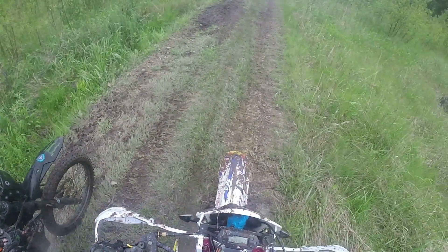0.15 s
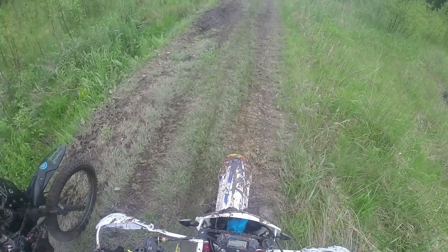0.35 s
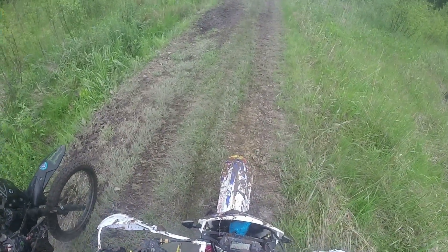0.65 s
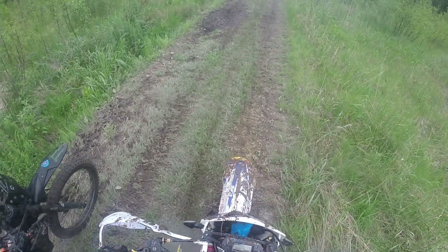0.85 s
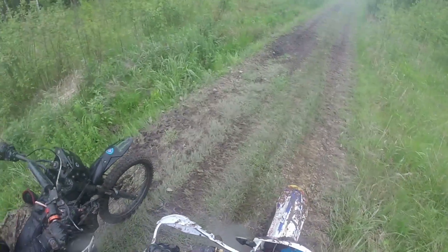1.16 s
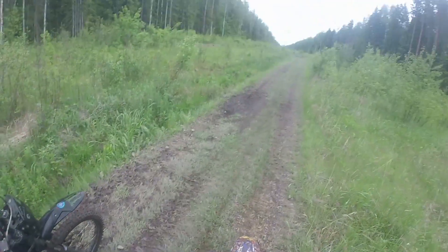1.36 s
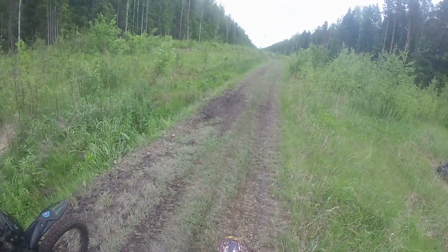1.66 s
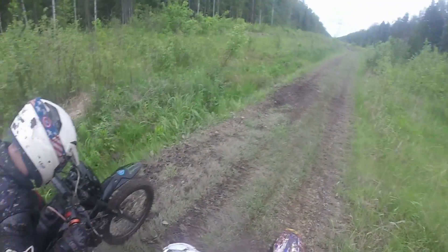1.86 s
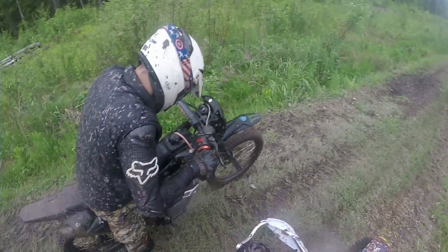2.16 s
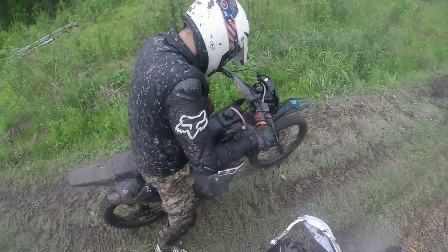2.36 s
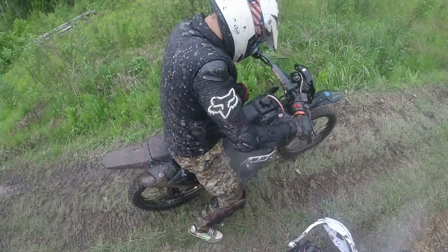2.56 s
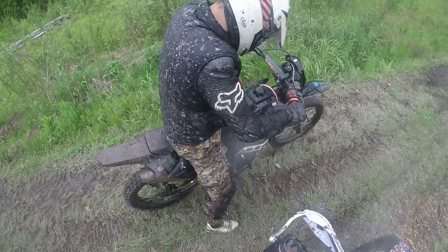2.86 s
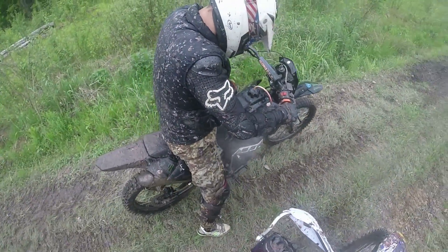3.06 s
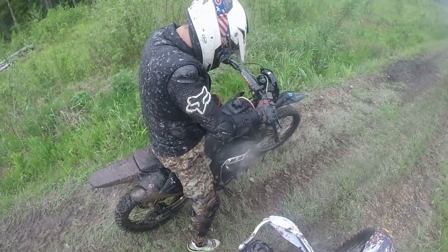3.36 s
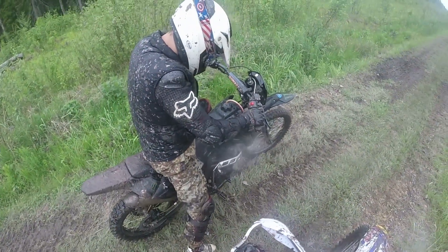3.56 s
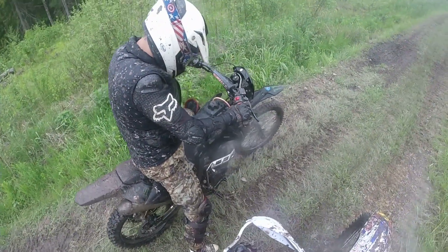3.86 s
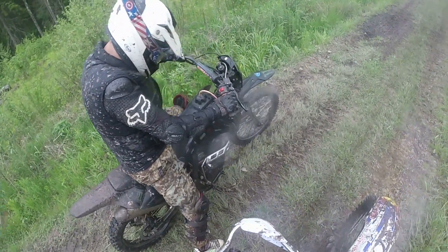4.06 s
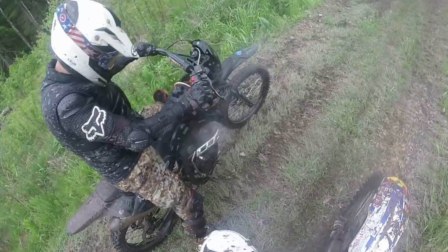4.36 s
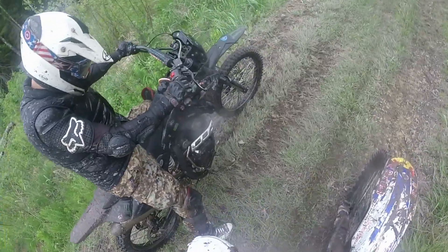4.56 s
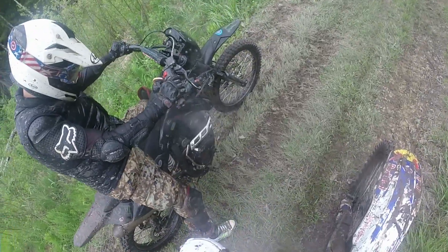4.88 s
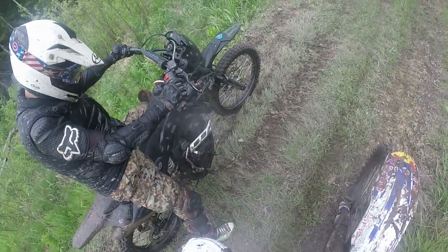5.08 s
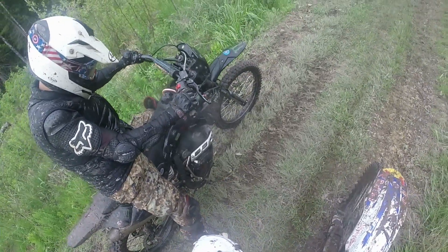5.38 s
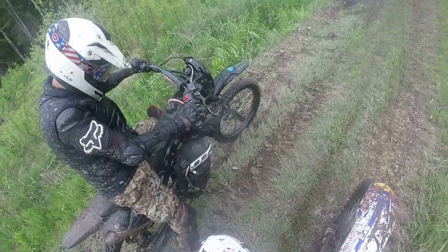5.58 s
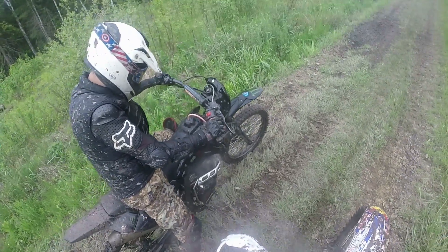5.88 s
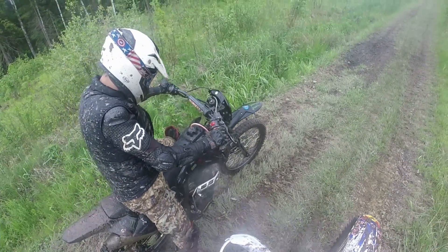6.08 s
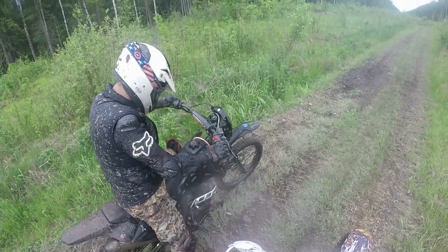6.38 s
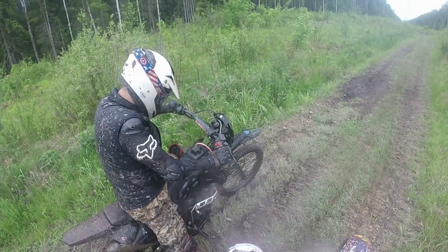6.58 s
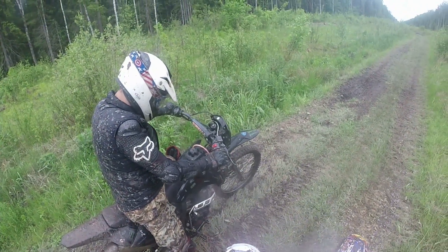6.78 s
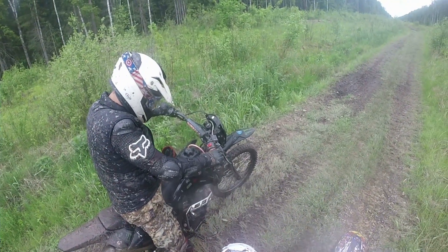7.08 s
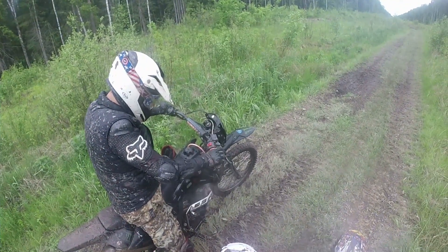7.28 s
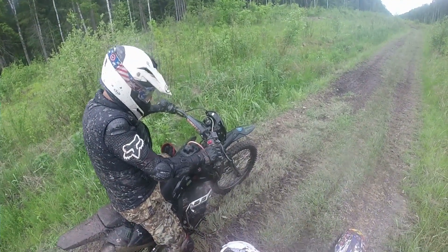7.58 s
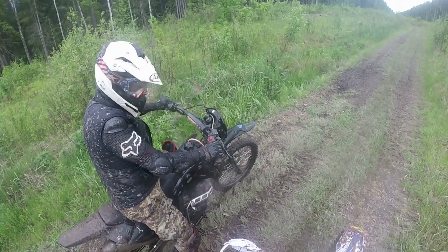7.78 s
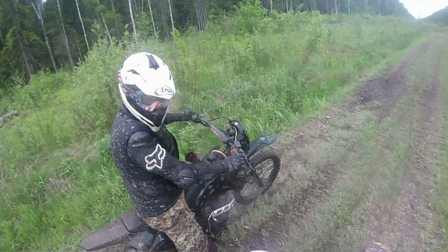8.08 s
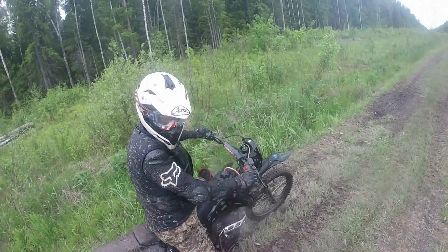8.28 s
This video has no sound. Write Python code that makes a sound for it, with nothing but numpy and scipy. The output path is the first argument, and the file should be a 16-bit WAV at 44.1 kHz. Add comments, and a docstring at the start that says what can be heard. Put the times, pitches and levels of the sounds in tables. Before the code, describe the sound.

Heard from a rider's helmet on an open forest track, a two-stroke dirt bike barks in uneven bursts with metallic clatter and one very loud sharp knock. It is cut, whines downward, slows and shudders to rest. After a brief quiet, a harsh bird-like chatter rattles in fast short-long pairs over a dry whirr, then fades. A second bike idles softly throughout under low breeze.

```python
"""Two-stroke bike dying on a forest track

A two-stroke enduro bike idles unevenly, heard from the rider's helmet; it is cut, runs down and rocks to rest.
Each turn puffs into resonant pipe modes, runs of firings bark, shaped noise clatters, sharp knocks ring out.
Then a harsh, bird-like chatter, perhaps a slipping starter: falling harmonic tones and rasp in short-long
pairs over a dry whirr. A second bike thuds softly throughout, under a low breeze; a faint forest echo follows
the chatter.
"""
import sys
import numpy as np
from scipy import signal
from scipy.fft import rfft, irfft
from scipy.io import wavfile
from scipy.ndimage import uniform_filter1d

SR = 44100
rng = np.random.default_rng(int(sys.argv[2]) if len(sys.argv) > 2 else 0)


def wrap_up_sound(samples):
    """Save the sound to the file named by the first command line argument, as 16-bit audio."""
    columns = np.atleast_2d(samples).T
    # keep every value between -1 and 1, then stretch to whole-number steps
    tamed = np.clip(columns, -1, 1)
    steps = np.round(tamed * 32767).astype(np.int16)
    wavfile.write(sys.argv[1], SR, steps)


N = 371763
TIME = np.arange(N) / SR

# runs of firings: (start [s], end [s], bark level [dB], added scatter between firings [dB])
FIRING = [(-.05, .02, -19.5, -0.5), (0.143, .33, -27.5, 6), (.45, .6, -24.5, 4.5), (.85, 1.012, -27, 3.5),
          (1.278, 1.437, -24.5, 5), (1.766, 1.936, -19, 1)]
STOP_S = 3.62  # crank comes to rest


def undb(db):
    """Decibels to gain."""
    return 10 ** (np.asarray(db) / 20)


def level(x, db):
    """Set the rms level."""
    return x * undb(db) / np.sqrt(np.mean(x ** 2) + 1e-18)


def curves(table):
    """Interpolate the columns of a table of timed rows, sample by sample."""
    times_s, *columns = np.transpose(table)
    return [np.interp(TIME, times_s, column) for column in columns]


def noise():
    """White noise."""
    return rng.standard_normal(N)


def walk(rate_hz):
    """Smoothed random steps, rms near 1."""
    step = max(int(SR / rate_hz), 2)
    steps = np.repeat(rng.standard_normal(N // step + 1), step)
    return level(uniform_filter1d(steps, step), 0)[:N]


def ring(x, hz, width_hz):
    """One resonance, gain 1 at its centre."""
    b, a = signal.iirpeak(hz, hz / width_hz, fs=SR)
    return signal.lfilter(b, a, x)


def colour(x, spectrum, size=8192):
    """Minimum-phase filter with the given (frequency [Hz], level [dB]) spectrum."""
    hz, db = np.transpose(spectrum)
    grid_hz = np.maximum(np.arange(size // 2 + 1) * SR / size, 1)
    gain = undb(np.interp(np.log(grid_hz), np.log(hz), db))
    # fold the cepstrum to make the filter causal
    cepstrum = irfft(np.log(gain))
    cepstrum[1:size // 2] *= 2
    cepstrum[size // 2 + 1:] = 0
    impulse = irfft(np.exp(rfft(cepstrum)))
    return signal.oaconvolve(x, impulse)[:N]


def steady(x, size=3500):
    """Bring the running rms to 1; size is the window in samples."""
    power = uniform_filter1d(uniform_filter1d(x ** 2, size), size)
    return x / np.sqrt(np.abs(power) + 1e-12)


def envelope(start_s, end_s, attack_s, release_s):
    """Linear rise from the start, hold until the end, exponential decay."""
    rise = np.clip((TIME - start_s) / attack_s, 0, 1)
    return rise * np.exp(-np.maximum(TIME - end_s, 0) / release_s)


def shell(x, direct):
    """Narrow resonances of helmet and camera case, added to the direct sound."""
    # case modes: (frequency [Hz], width [Hz], level [dB])
    case_modes = [(1480, 190, 0), (2650, 280, 0), (3660, 130, 0), (4680, 150, 4), (6300, 320, 0),
                  (6850, 260, -2)]
    return direct * x + sum(undb(db) * ring(x, hz, width_hz) for hz, width_hz, db in case_modes)


def loudness(crank_hz):
    """Gains of pumping, bark and clatter: speed sets the base, firings and rattles add power."""
    # unfired turns: (crank speed [turns/s], pumping level [dB], pipe level [dB], clatter level [dB])
    by_speed = [(20.05, -47.5, -46.5, -53), (29.82, -33, -41.5, -42.5), (43.7, -30, -35, -36),
                (51.52, -32, -32, -33), (58.95, -31.5, -29, -27), (66.6, -31, -27, -24.5)]
    # bouts of extra metal rattle: (start [s], end [s], level [dB])
    rattles = [(.05, 0.145, -25.5), (0.805, .812, -18), (1.499, 1.5, -27)]
    stop_fade_s = 0.071
    bark_attack_s, bark_release_s = 0.046, 0.026
    boom_db, boom_attack_s, boom_release_s = -28, 0.045, 0.16
    rattle_attack_s, rattle_release_s = .004, 0.0093

    speeds_hz, *columns = np.transpose(by_speed)
    turning = np.exp(-np.maximum(TIME - STOP_S, 0) / stop_fade_s)
    pump, bark, metal = (undb(np.interp(crank_hz, speeds_hz, db)) * turning for db in columns)
    for start_s, end_s, db, _ in FIRING:
        # firings also deepen the pumping of the chamber
        pump = np.hypot(pump, undb(boom_db) * envelope(start_s, end_s, boom_attack_s, boom_release_s))
        bark = np.hypot(bark, undb(db) * envelope(start_s, end_s, bark_attack_s, bark_release_s))
    for start_s, end_s, db in rattles:
        metal = np.hypot(metal, undb(db) * envelope(start_s, end_s, rattle_attack_s, rattle_release_s))
    return pump, bark, metal


def pumping(puffs, coasting, chance):
    """The chamber breathes on every turn, fired or not: pulses through low resonances."""
    uneven = puffs * undb((4.0 + 2 * coasting) * chance)
    return ring(ring(uneven, 146.3, 65), 108.0, 48.5) + 0.0059 * ring(puffs, 75, 50)


def exhaust(puffs, phase, coasting, chance):
    """Puffs and turbulent gas excite the pipe modes; firings alter scatter and gas."""
    # pipe modes: (frequency [Hz], width [Hz], level [dB])
    pipe_modes = [(197, 32, 2), (261.4, 69.4, 10.5), (356.6, 51, 2), (365, 15, -6), (570, 59, -14.5)]
    smear_hz, smear_width_hz = 298, 144

    scatter_db = sum(db * ((TIME > start_s) & (TIME < end_s)) for start_s, end_s, _, db in FIRING)
    gas = (.012 + .008 * scatter_db) * np.exp(-phase / .6) * noise()
    blast = (puffs + gas) * undb((3 + scatter_db + 2 * coasting) * chance)
    # all-pass: the pipe spreads each puff out in time
    blast = blast - 2 * ring(blast, smear_hz, smear_width_hz)
    # neighbouring modes swing in opposite senses, so each bark swells roundly
    modes = sum((-1) ** k * undb(db) * ring(blast, hz, width_hz)
                for k, (hz, width_hz, db) in enumerate(pipe_modes))
    return ring(modes, 404, 252)


def slaps(turn, phase, memory=.9, count=500):
    """Metal impulses at fixed crank angles; their strengths drift from turn to turn."""
    draws = rng.standard_normal((turn.max() + 21, count))
    pattern = signal.lfilter([1], [1, -memory], draws, axis=0)[20:]  # skip the filter's start
    angle = (phase * count).astype(int)
    return level(pattern[turn, angle] * (np.diff(angle, prepend=0) != 0), 0)


def clatter(gate, turn, phase, coasting):
    """Piston and gears: gated noise and slaps, cross-faded to a coasting spectrum."""
    # running engine: (frequency [Hz], relative level [dB])
    running_spectrum = [(300, -25.5), (510, -1), (610, -15), (800, -14), (1030, -11.5), (1280, -4.5),
                        (1470, -8), (1650, -11), (2500, -9), (3230, -14.5), (4700, -20), (5230, -27.5),
                        (6900, -26.5), (7600, -33.5), (11000, -41), (15000, -50.5)]
    # dead engine: (frequency [Hz], relative level [dB])
    coasting_spectrum = [(400, -10), (520, -0.5), (640, -14), (850, -14), (1010, 2), (1200, -12),
                         (1500, -7.5), (1820, -3.5), (2600, -14), (3100, -10), (4100, -18.5), (4700, -13.5),
                         (5200, -23.5), (6200, -20), (7600, -31.5), (15000, -49)]
    metal = gate * (noise() * undb(2.5 * walk(700)) + 1.7 * slaps(turn, phase))
    running = steady(shell(colour(metal, running_spectrum), direct=3.2))
    return (1 - coasting) * running + coasting * steady(colour(metal, coasting_spectrum))


def engine():
    """One puff a turn drives pumping and exhaust; clatter and whine pulse with the crank."""
    # crank speed, up in firing runs, sagging between: (time [s], speed [turns/s])
    crank_speed = [(0.0, 66.3), (0.24, 61.68), (0.3, 63.7), (0.49, 58.8), (0.64, 63.72), (0.87, 54.6),
                   (1.0, 60.04), (1.28, 51.74), (1.47, 61.34), (1.72, 51.78), (1.8, 55.94), (1.96, 68.7),
                   (2.01, 68), (2.19, 60.23), (2.81, 36.93), (3.07, 28.9), (3.2, 26.6), (3.5, 20.57)]
    crank_hz, = curves(crank_speed)
    pump_gain, bark_gain, clatter_gain = loudness(crank_hz)
    turns = np.cumsum(crank_hz * (1 + .003 * walk(70))) / SR + .7
    phase, turn = turns % 1, turns.astype(int)
    puffs = np.diff(turn, prepend=0)
    # fresh chances each turn
    pump_chance, bark_chance, gate_chance = rng.uniform(-1, 1, (1000, 3))[turn].T
    coasting = np.clip((TIME - 2.25) / .45, 0, 1)

    # peaks once a turn; strokes stand out more when coasting
    stroke = np.exp(-((phase - .3 * (1 - coasting)) % 1) / 0.53)
    gate = (1.2 - .5 * coasting + stroke) * undb(1.54 * gate_chance)

    pump = steady(pumping(puffs, coasting, pump_chance)) * pump_gain
    bark = steady(exhaust(puffs, phase, coasting, bark_chance)) * bark_gain
    metal = steady(clatter(gate, turn, phase, coasting)) * clatter_gain
    return pump + bark + metal + gate * whine()


def idle():
    """A second bike ticks over: uneven pulses through low, muffling resonances."""
    # soft idle: (time [s], mean rate [beats/s], level [dB])
    idle_course = [(4.2, 10.5, -49), (5.3, 11.2, -44), (7, 10.2, -48.5)]
    beat_hz, db = curves(idle_course)
    beat = (np.cumsum(beat_hz * (1 + 0.0467 * walk(11))) / SR).astype(int)
    puffs = np.diff(beat, prepend=0) * undb(1.5 * walk(11)) + .005 * noise()
    thuds = ring(ring(ring(puffs, 107, 49), 77.0, 67), 80, 85)
    return level(thuds, 0) * undb(db)


def outdoors():
    """Soft hiss of the trees; low noise as the breeze buffets the microphone."""
    # tree hiss: (frequency [Hz], relative level [dB])
    hiss_spectrum = [(90, -7), (160, -3.5), (300, -4.5), (520, -10.5), (700, -11), (1160, -13.5),
                     (1840, -17.5), (2500, -17.5), (3500, -21.5), (4900, -24.5), (8000, -32.5),
                     (12000, -40.5), (15000, -54)]
    # breeze rumble: (frequency [Hz], relative level [dB])
    rumble_spectrum = [(10, 2), (22, -5), (36, 5), (52, -5.5), (85, -15), (130, -23.5), (220, -31.5),
                       (500, -62)]
    trees_db = -47
    breeze_start_db, breeze_ease_db_per_s = -37, 0.22
    lull_s, lull_width_s, lull_db = 4.47, 0.23, -7

    lull = lull_db * np.exp(-((TIME - lull_s) / lull_width_s) ** 2)
    rumble_db = breeze_start_db - breeze_ease_db_per_s * TIME + lull
    sway, buffet = undb(.5 * walk(4)), undb(1.5 * walk(9))
    trees = level(colour(noise(), hiss_spectrum), 0) * sway
    rumble = steady(colour(noise(), rumble_spectrum), size=12000) * buffet
    return trees * undb(trees_db) + rumble * undb(rumble_db)


def knocks(decay_s=0.0039, rattle=0.14):
    """Impulses with a few milliseconds of rattle; each also thuds in the pipe."""
    # hard knocks: (time [s], crack peak level [dB], pipe thud peak level [dB])
    knock_times = [(0.8088, 1.5, -13), (1.214, -20, -17.5), (1.499, -6, -26), (2.24, -10, -16.5),
                   (2.465, -19, -20.5)]
    # crack: (frequency [Hz], relative level [dB])
    crack_spectrum = [(150, -61), (500, -44), (900, -24), (1450, 14.5), (1800, -3), (2250, 13), (2750, 6),
                      (3400, -19), (4600, -17), (6000, -20), (15000, -72)]
    out = np.zeros(N)
    t = TIME[:2000]
    for time_s, crack_db, thud_db in knock_times:
        push = np.zeros(N)
        i = int(time_s * SR)
        push[i] = -1
        thud = ring(push, 497, 38.3) + 0.67 * ring(push, 250.0, 57.9)
        push[i:i + len(t)] += rattle * rng.standard_normal(len(t)) * np.exp(-t / decay_s)
        crack = colour(push, crack_spectrum)
        out += undb(crack_db) * crack / np.abs(crack).max()
        out += undb(thud_db) * thud / np.abs(thud).max()
    return out


def whine(blur_hz=141):
    """Gear whine once the engine is cut: a blurred tone sinks as the crank slows."""
    start_s, start_hz, sag_hz_per_s = 1.9, 3900, 1150
    mean_db, attack_s, release_s = -37, 0.21, 0.39  # level ahead of the crank gate
    hz = start_hz - sag_hz_per_s * (np.clip(TIME, start_s, STOP_S) - start_s)
    swell = envelope(start_s, start_s + attack_s, attack_s, release_s)
    tone = np.sin(2 * np.pi * np.cumsum(hz + blur_hz * walk(600)) / SR)
    return tone * undb(mean_db + 2 * walk(60.8)) * swell


def rocking():
    """The engine rocks on its springs as it stops: a deep, slowing sine shudder."""
    start_s, start_hz, sag_hz_per_s = 3.42, 46.17, 41.3
    peak_db, attack_s, hold_s, release_s = -20.5, 0.14, 0.11, .11
    hz = np.maximum(start_hz - sag_hz_per_s * (TIME - start_s), 20)
    swell = envelope(start_s, start_s + attack_s + hold_s, attack_s, release_s)
    return np.sin(2 * np.pi * np.cumsum(hz * (TIME > start_s)) / SR) * undb(peak_db) * swell


def pairs(count=9):
    """The even run of short-long squawks, slowing and fading as it goes."""
    # short and long squawk: (place in cycle [0-1], length [s], relative level [dB],
    #                         first pitch [Hz], last pitch [Hz], rasp [0-1])
    cycle_pair = [(0, 0.0256, -15, 1715, 1406, 0.61), (.337, .041, -13, 1742, 1129, 0.69)]
    start_s, cycle_s, cycle_growth_s, fade_db_per_s = 5.096, .197, .0012, 3.5
    rows = []
    for cycle in range(count):
        for place, length_s, db, *voice in cycle_pair:
            cycles = cycle + place
            elapsed_s = cycle_s * cycles + cycle_growth_s * cycles ** 2 / 2
            rows.append((start_s + elapsed_s, length_s, db - fade_db_per_s * elapsed_s, *voice))
    return rows


def dry_whirr():
    """Fading, wavering gain of the noise under the squawks."""
    start_s, end_s, attack_s, release_s = 4.65, 7.15, .02, 0.039
    start_db, fade_db_per_s = -33.5, 3.5  # ahead of the rasp filter
    db = start_db - fade_db_per_s * (TIME - start_s) + 1.45 * walk(70)
    return undb(db) * envelope(start_s, end_s, attack_s, release_s)


def chatter(jitter=0.036, flutter_db=2.0, harmonics=9, swell=1.4, rasp_swell=1.27):
    """Each squawk is a rough falling harmonic tone wrapped in rasp; a dry whirr joins them."""
    # out of step as the chatter catches and dies: (start [s], length [s], relative level [dB],
    #                                               first pitch [Hz], last pitch [Hz], rasp [0-1])
    loose_squawks = [(4.668, 0.098, -21.5, 790, 569, 0.76), (4.814, 0.033, -19.5, 1484, 1313, 0.68),
                     (4.85, 0.087, -19, 1500, 1346, 0.85), (4.956, 0.05, -14, 1730, 1148, 0.56),
                     (6.955, 0.0186, -23.5, 1894, 1516, 0.33), (7.039, 0.032, -27.5, 1966, 1545, .75),
                     (7.1, 0.067, -36.5, 1980, 1790, 0.5)]
    # rasp and whirr: (frequency [Hz], relative level [dB])
    rasp_spectrum = [(500, -34), (1000, -18.5), (1400, -3.5), (2000, 3.5), (2700, -0.5), (3300, -3.5),
                     (4700, -5), (5500, -4.5), (6400, -12), (8000, -14), (11000, -20), (15000, -34)]
    # tones: (frequency [Hz], relative level [dB])
    squeal_spectrum = [(600, 4), (1100, -3), (1500, -1), (2100, 17), (2750, 9), (3400, -7), (4700, 6),
                       (5500, -4.5), (6400, 0.5), (8000, -19), (15000, -21)]
    scatter_db, scatter_pitch = 0.26, 0.0116  # rms, squawk to squawk; pitch as a fraction

    tones, gusts = np.zeros(N), np.zeros(N)
    wobble = walk(900)
    k = np.arange(1, harmonics + 1)[:, None]
    for start_s, length_s, db, first_hz, last_hz, rasp in list(loose_squawks) + pairs():
        level_chance, pitch_chance = rng.standard_normal(2)
        u = np.linspace(0, 1, int(length_s * SR))
        first = int(start_s * SR)
        span = slice(first, first + len(u))
        gain = undb(db + scatter_db * level_chance)
        glide_hz = first_hz + (last_hz - first_hz) * u
        hz = glide_hz * (1 + scatter_pitch * pitch_chance + jitter * rasp * wobble[span])
        partials = np.sin(2 * np.pi * k * np.cumsum(hz) / SR) / k ** .5
        tone = level(partials.sum(axis=0), 0)
        # tone and rasp swell quickly and taper off
        arch = np.abs(np.sin(np.pi * u ** .85))
        tones[span] += gain * np.sqrt(1 - rasp) * arch ** swell * tone
        gusts[span] += gain * np.sqrt(rasp) * arch ** rasp_swell

    flutter = undb(flutter_db * walk(700))
    hiss = colour((gusts + dry_whirr()) * flutter * noise(), rasp_spectrum)
    squeal = colour(tones * flutter, squeal_spectrum)
    return shell(undb(-4.5) * squeal + undb(3.5) * hiss, direct=0.5)


def forest(x, t60_s=0.38, wet_db=-23):
    """Trunks scatter a thin, dull echo: decaying noise convolved with the sound."""
    t = TIME[:SR]
    echoes = rng.standard_normal(SR) * undb(-60 * t / t60_s) * np.clip(t / 0.013, 0, 1)
    impulse = level(echoes, wet_db) / np.sqrt(SR)
    return ring(signal.oaconvolve(x, impulse)[:N], 3000, 9000)


def scene():
    """Engine first, then the chatter, in the open air."""
    squawks = chatter()
    bikes = engine() + idle() + knocks() + rocking()
    return (bikes + squawks + forest(squawks) + outdoors())[None]


def record(dry):
    """The camera clips at full scale and cuts the top."""
    top_hz = 15100
    lowpass = signal.ellip(8, .2, 70, top_hz, fs=SR, output="sos")
    return signal.sosfilt(lowpass, np.clip(dry, -1, 1))


dry = scene()
out = record(dry)
wrap_up_sound(out)
```